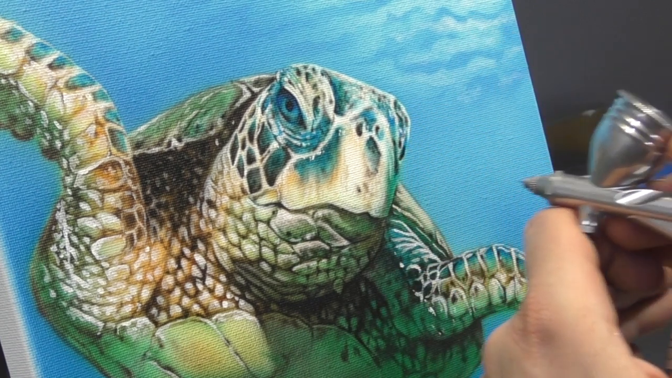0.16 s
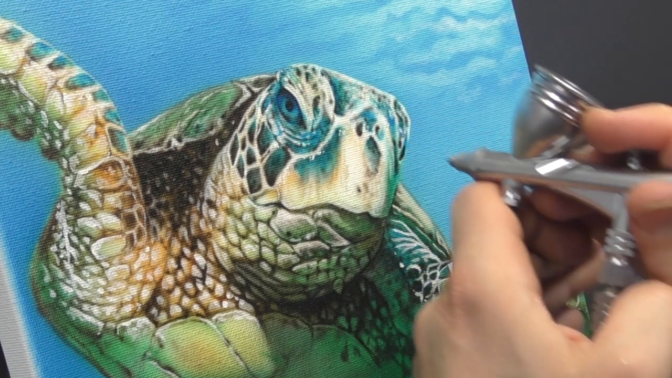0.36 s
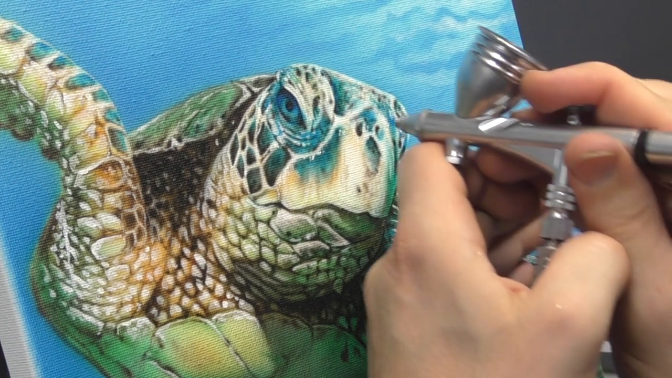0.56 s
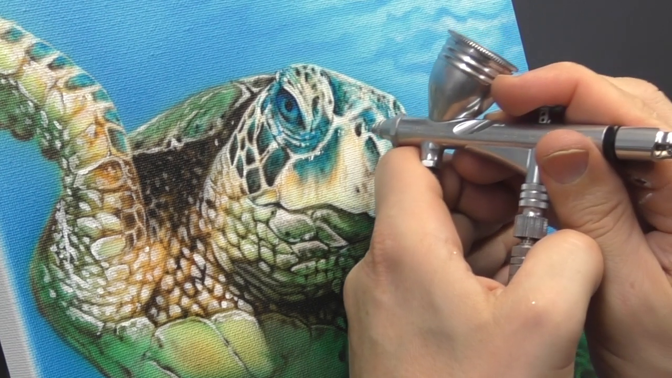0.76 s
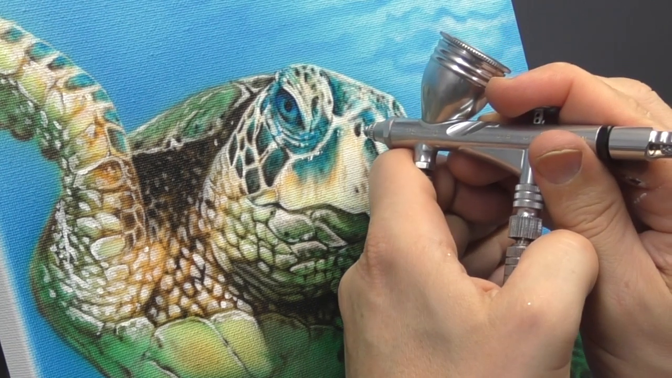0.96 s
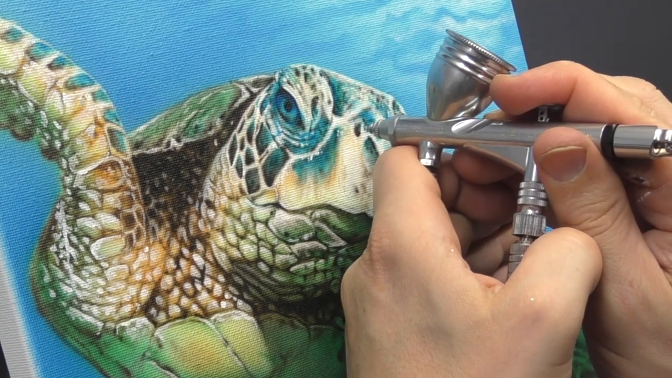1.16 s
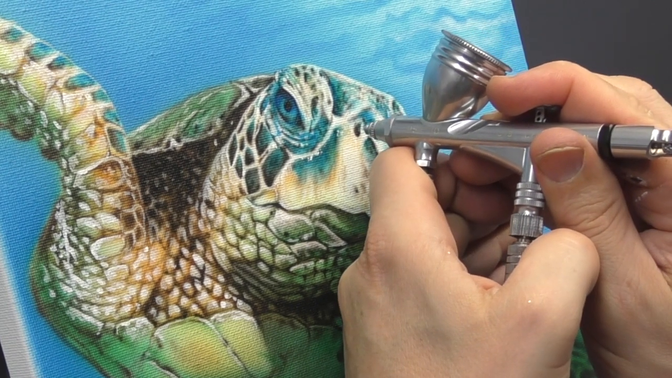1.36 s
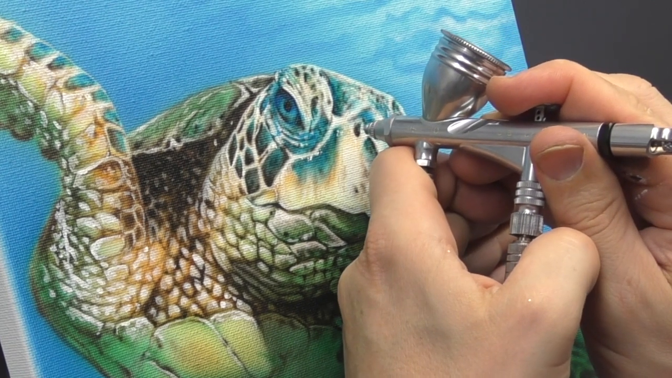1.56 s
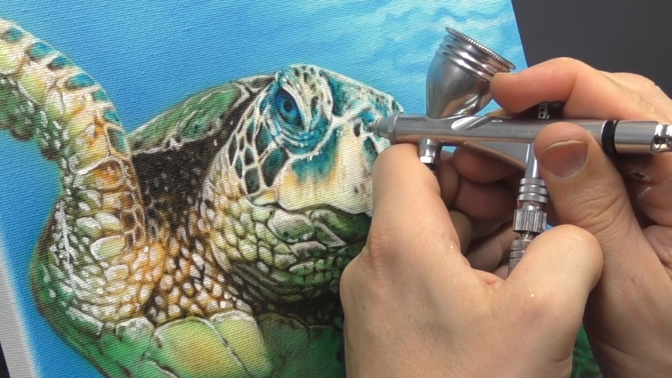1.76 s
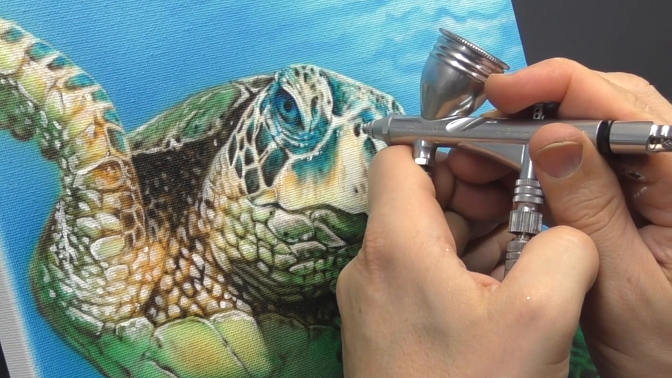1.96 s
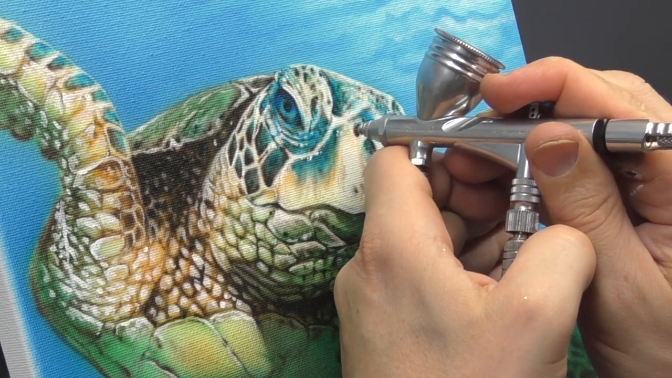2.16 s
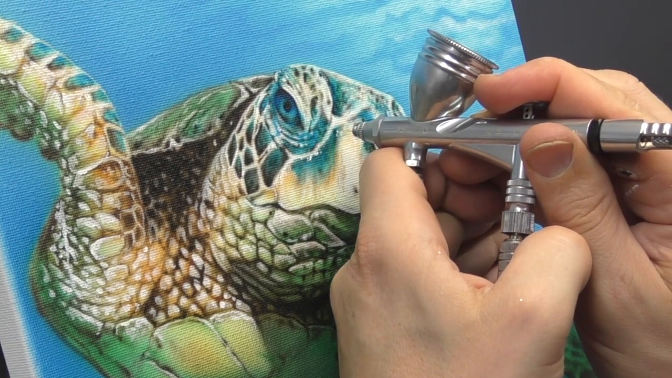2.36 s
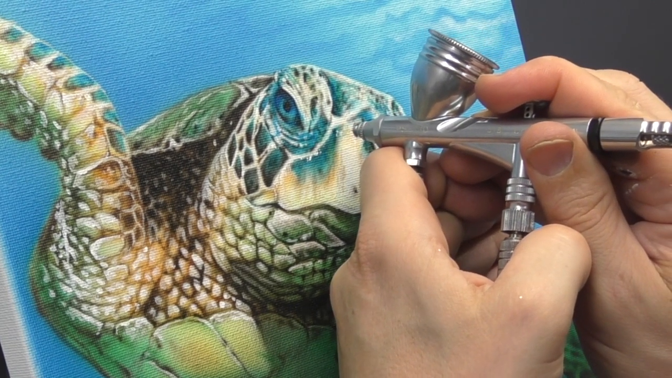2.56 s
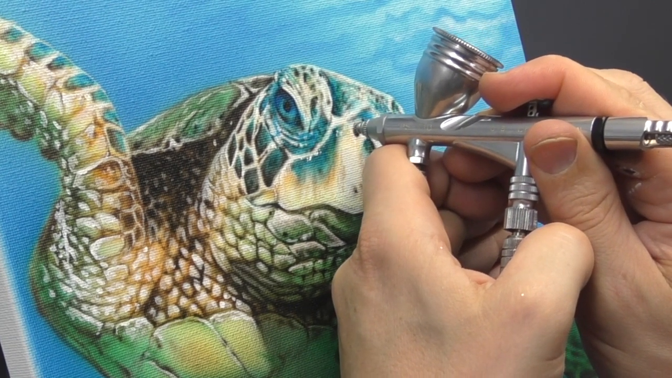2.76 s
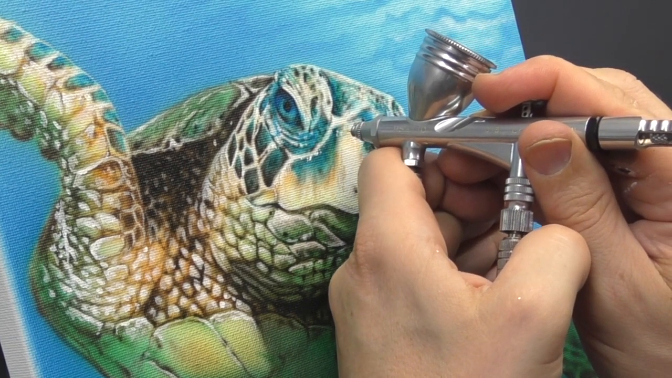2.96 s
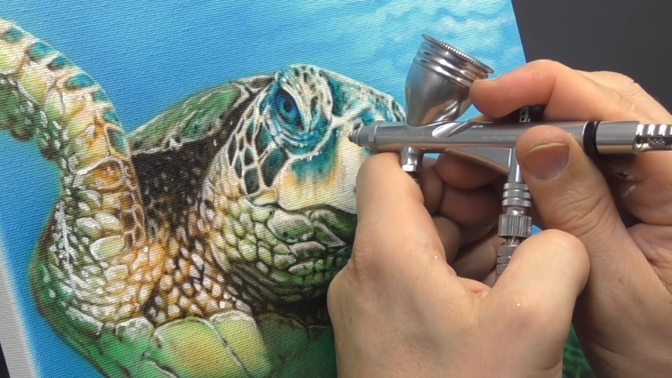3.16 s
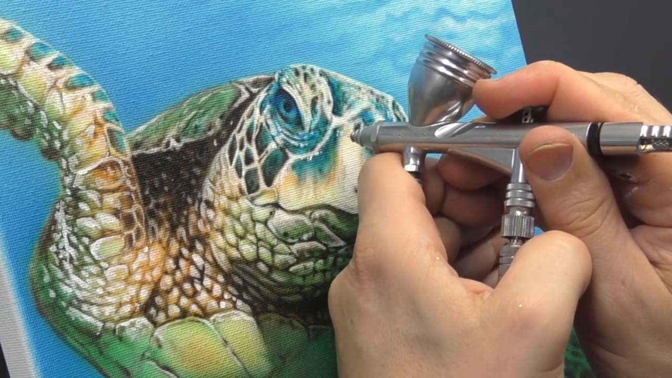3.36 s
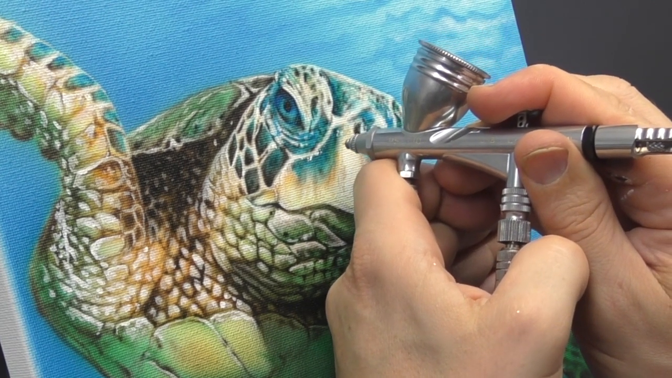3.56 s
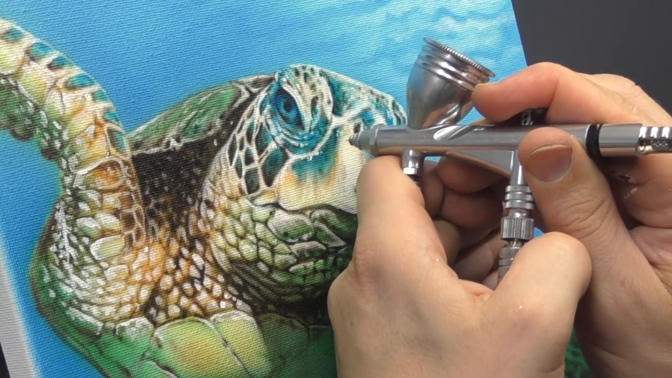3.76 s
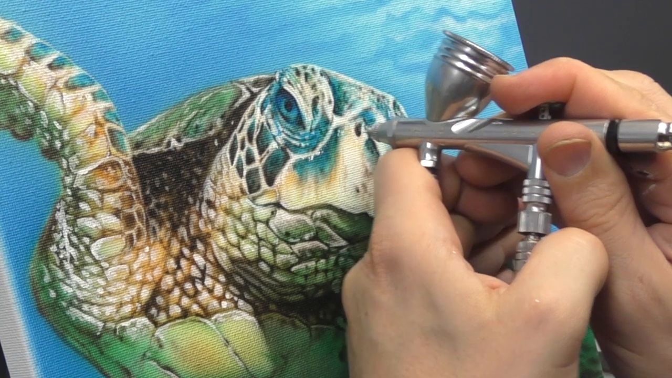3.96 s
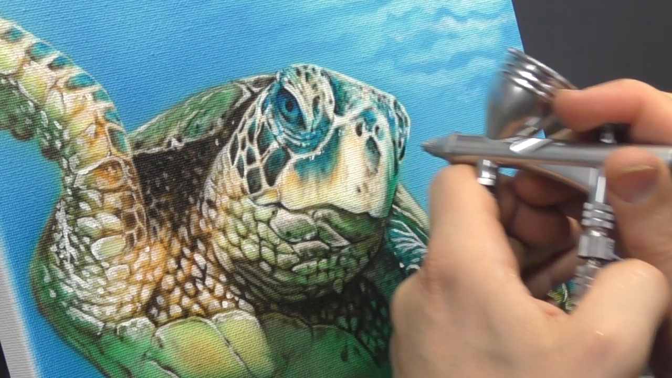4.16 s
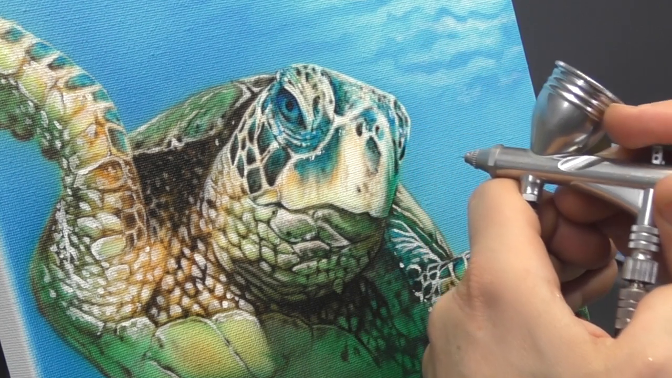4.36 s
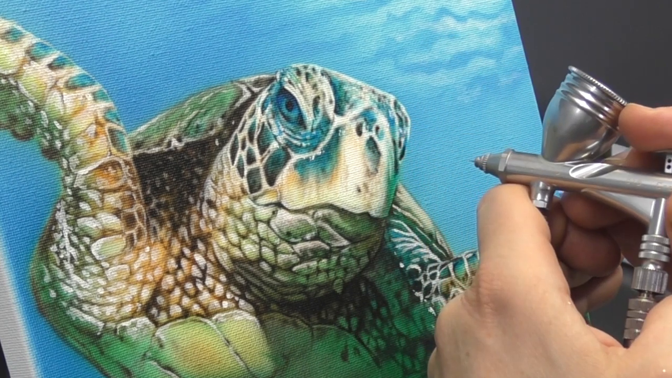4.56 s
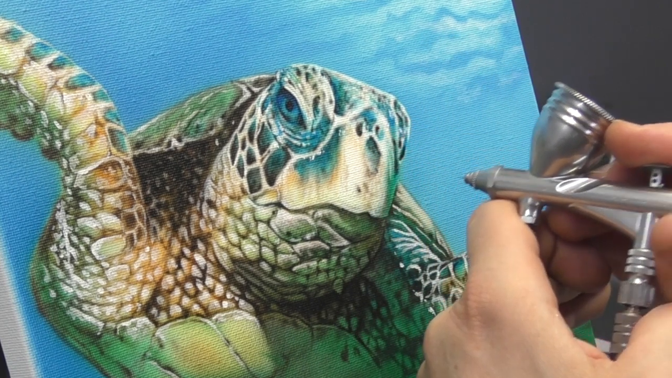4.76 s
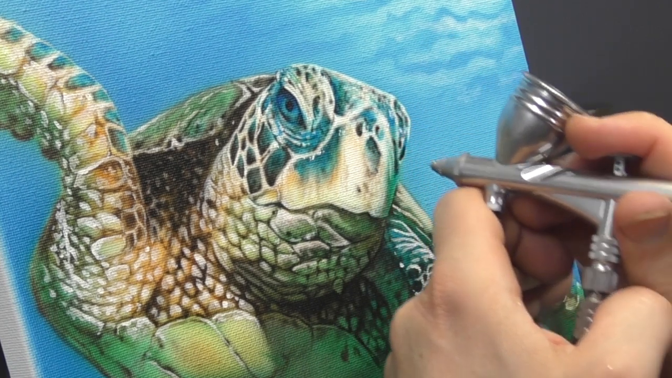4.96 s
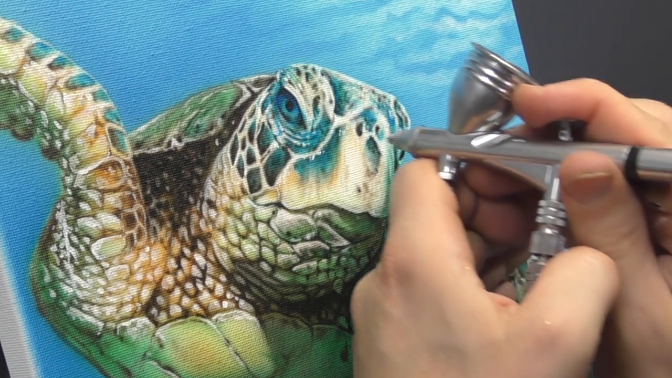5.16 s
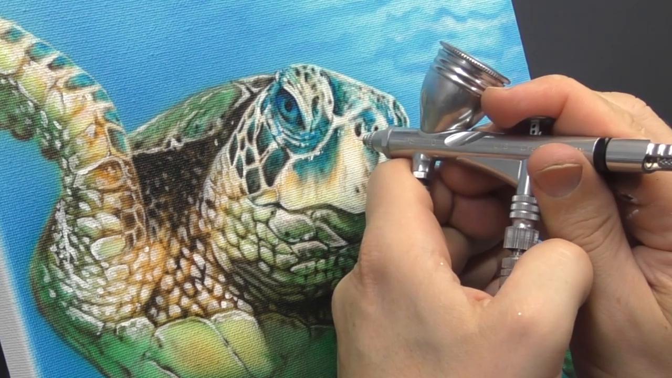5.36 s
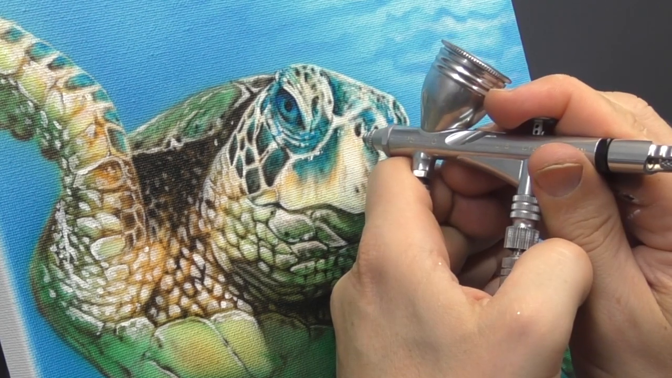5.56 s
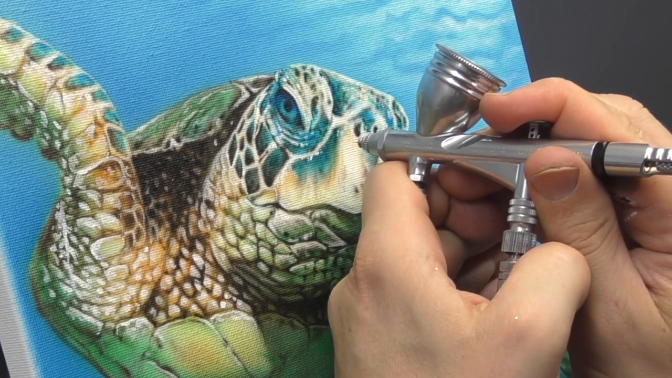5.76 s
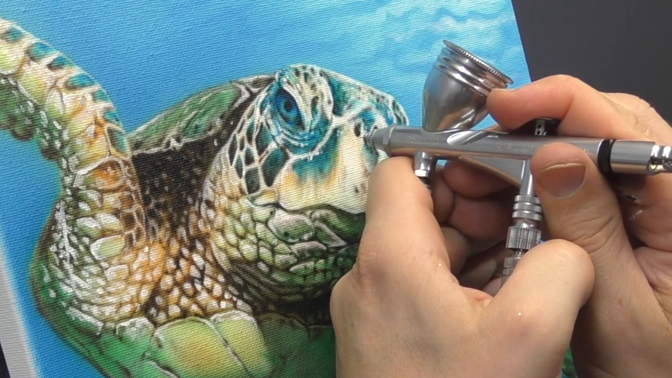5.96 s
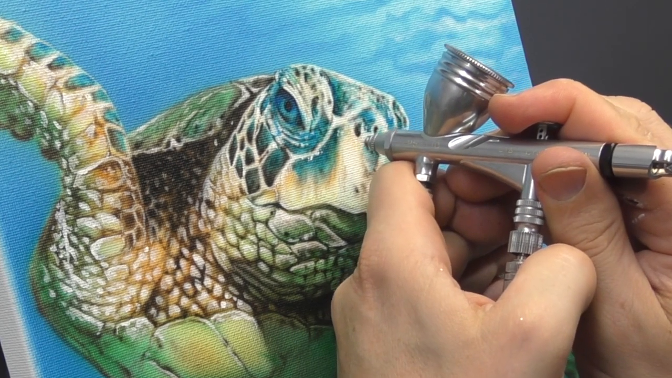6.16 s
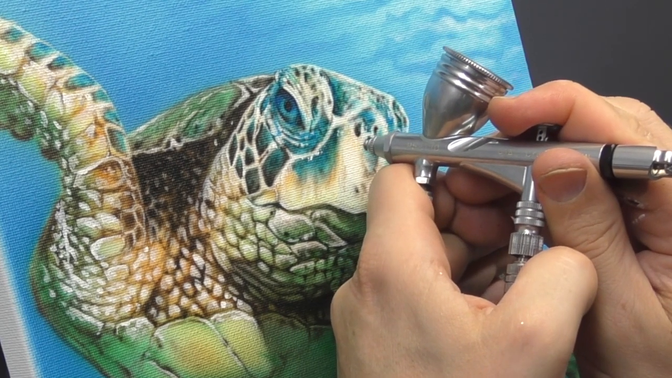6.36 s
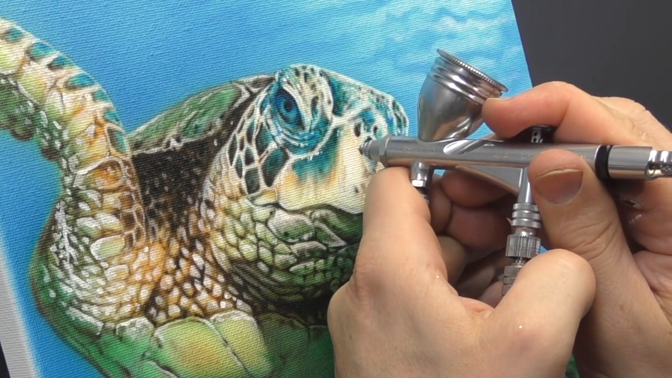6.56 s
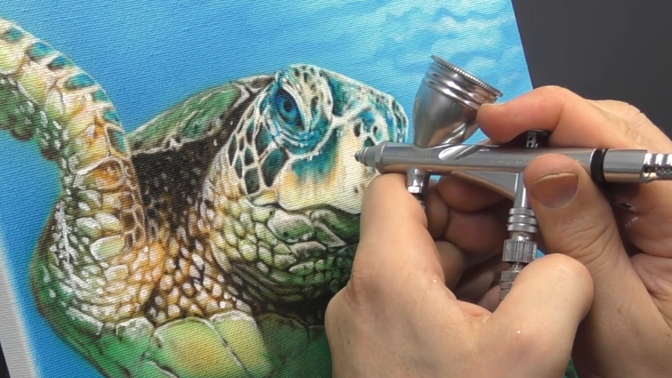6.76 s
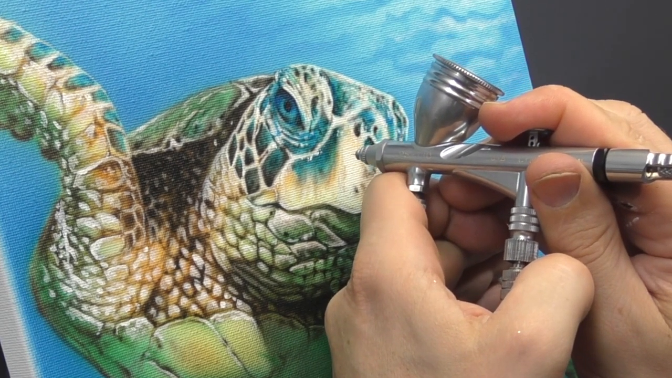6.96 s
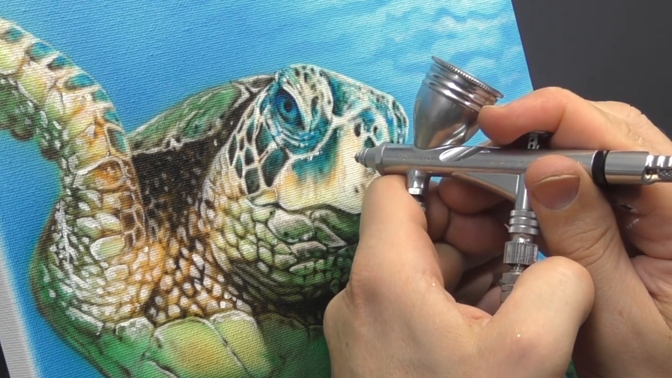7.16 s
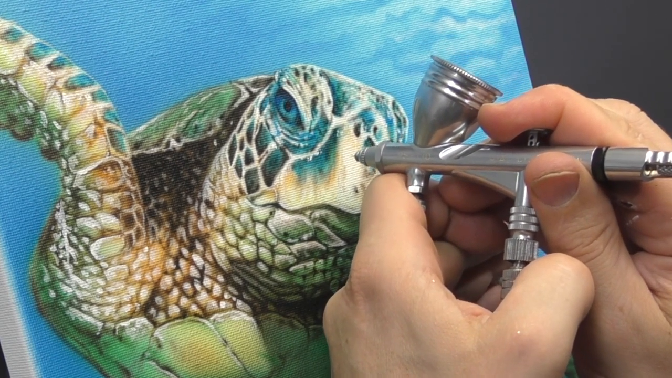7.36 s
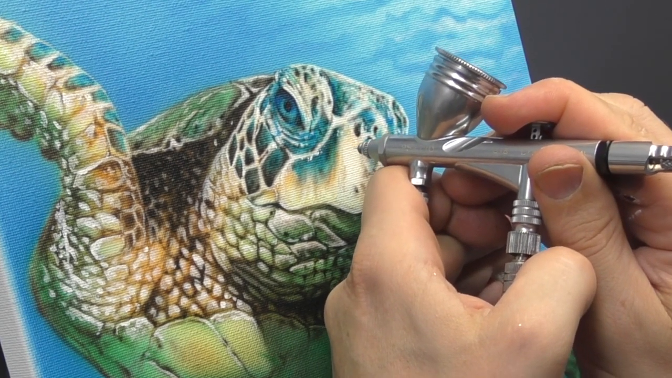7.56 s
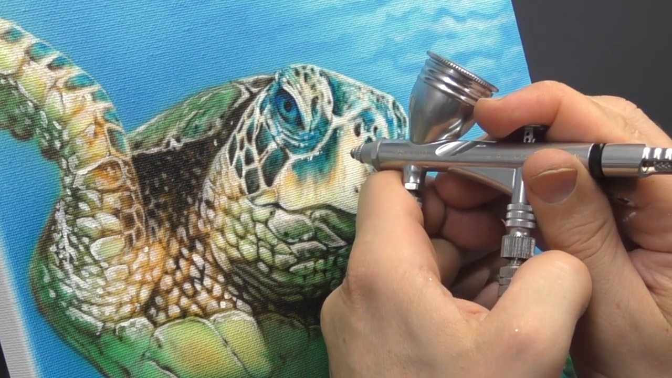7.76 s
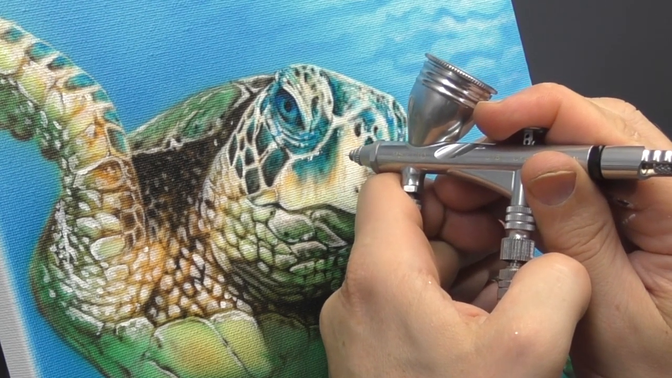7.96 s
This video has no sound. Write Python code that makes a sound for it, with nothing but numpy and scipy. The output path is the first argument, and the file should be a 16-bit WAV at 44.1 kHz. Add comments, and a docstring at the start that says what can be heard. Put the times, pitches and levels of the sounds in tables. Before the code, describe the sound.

In a quiet studio, an airbrush sprays a long crisp hiss, stops briefly with faint handling taps, then sprays again to the end.

```python
"""A bright airbrush hiss, fizzing with droplets, in two long strokes close to a small stereo microphone.
Near the canvas the jet hisses; as a free jet it rushes more hollowly. The second stroke runs on to the end.
The jet is shaped noise set by flow and nozzle gap; soft knocks of the hands are short bursts of noise.
The quiet studio adds echoes and a short tail; beneath lie room noise, mains hum in sines and far traffic,
made of rumbling noise and gliding drones."""
import sys
import numpy as np
from scipy import signal
from scipy.fft import rfft, irfft
from scipy.io import wavfile
from scipy.ndimage import uniform_filter1d

SR = 44100
rng = np.random.default_rng(int(sys.argv[2]) if len(sys.argv) > 2 else 0)


def materialize(psi):
    """Save the field psi as 16-bit PCM at rate SR to the path in sys.argv[1].

    A 1-D psi becomes a single channel; in a 2-D psi each row is a channel.
    """
    bounded = np.clip(np.atleast_2d(psi).T, -1, 1)
    quanta = np.round(bounded * 32767).astype(np.int16)
    wavfile.write(sys.argv[1], SR, quanta)


N = 353682

# Room noise colour: [f/Hz, relative level/dB]
ROOM_COLOUR = [(20, -19), (50, -20.5), (95, 5.5), (250, -1), (420, -6), (620, -22.5), (850, -14),
               (1200, -9.5), (2300, -13.5), (3300, -17.5), (4500, -24), (6500, -31.5), (8800, -27.5),
               (15700, -22.5)]
# Likeness of far sounds in the two channels: [f/Hz, likeness 0-1]
ROOM_LIKENESS = [(30, 0), (80, 0.54), (160, 0.37), (700, 0.28), (1500, 0.4), (3000, 0.56), (7000, 1),
                 (15000, 0.55)]
# Mains hum partials: [f/Hz, rms level/dB]
HUM_PARTIALS = [(100, -79.5), (300, -75), (400, -78), (500, -85.5), (1300, -91), (1500, -82.5), (1700, -88)]
# Far traffic rumble colour: [f/Hz, relative level/dB]
TRAFFIC_COLOUR = [(30, -22), (55, -19), (78, -3), (120, -4), (195, 1), (290, -7.5), (420, -16.5),
                  (900, -29), (3000, -60)]
# Swells of far traffic, one row per rise or fall of the drone:
# [loudest t/s, half length/s, rumble level/dB, drone level/dB, drone f/Hz when loudest, glide/Hz per s]
TRAFFIC_SWELLS = [(0.616, 0.28, -69.5, -68, 140, 22.5), (1.297, 0.4, -68.5, -76, 122, -34.5),
                  (2.304, 0.4, -75, -75, 104, -10.5), (3.444, 0.23, -73, -74, 87, -25),
                  (4.049, 0.42, -68, -66.5, 130, -11), (5.7, 0.3, -74, -72, 125, 8),
                  (6.425, 0.226, -64.5, -73, 139, 22), (7.1, 0.45, -67.5, -70, 115, 14.5),
                  (7.796, 0.25, -71, -66.5, 107, 7)]
# Studio reverberation: [f/Hz, t60/s]
STUDIO_DECAY = [(300, 0.23), (3000, 0.53), (8000, 0.42), (15000, 0.31)]
# Early reflections from easel and desk: [delay t/s, gain]
EASEL_DESK_ECHOES = [(.00318, .11), (.00497, .06)]
# Hands and trigger knocking: [t/s, onset rms level/dB, centre f/Hz, width/octaves, t60/s]
HAND_KNOCKS = [(0.476, -67, 950, 0.48, .12), (0.533, -71, 6500, .5, .04), (0.548, -56.5, 900, 0.56, 0.1),
               (0.609, -52, 1050, 0.55, 0.034), (4.693, -58, 130, 0.59, 0.068),
               (4.927, -70, 7030, 0.51, 0.14), (5.186, -50.5, 280, 0.53, 0.056),
               (5.185, -63, 1900, 1.0, .07)]
# Air seeping past the valve, its colour: [f/Hz, relative level/dB]
VALVE_SEEP_COLOUR = [(200, -11), (700, -9), (1200, 5), (2500, -6), (4200, -7.5), (5500, -9), (8000, -11),
                     (9700, -10), (11500, -14), (15700, -19)]
# Strokes, one row each: [valve opens t/s, valve shuts t/s, starts to close in t/s, is drawn clear t/s,
# rush level relative to mean hiss/dB, seep length/s, seep level/dB]
BRUSH_STROKES = [(0.618, 4.233, 0.71, 4.15, -16.5, 0.12, -76.5), (5.257, 8.1, 5.2, 8.6, -16.5, 0.24, -65)]
# Flow set by the trigger finger, one list a stroke: [t/s, hiss level close to the canvas/dB]
TRIGGER_FLOW = [
    [(0.9, -39), (1.54, -38), (2.21, -39), (2.29, -41), (3.36, -42), (3.45, -40.5), (3.68, -42),
     (3.85, -40)],
    [(5.35, -38.5), (5.44, -38), (7.98, -37)],
]
# Jet colour: [f/Hz, relative level/dB close in first stroke, close in second, as a free jet]
JET_COLOUR = [(250, -22, -19.5, -14.5), (424, -22.5, -21.5, -14), (710, -31, -32, -23),
              (1165, -27.5, -26.5, -13.5), (2970, -18, -18.5, -9.5), (3880, -20.5, -21, -16.5),
              (5060, -20, -18.5, -17), (6770, -15.5, -13, -18), (8020, -13.5, -13.5, -17.5),
              (8900, -7.5, -9, -12), (11800, -3, -2.5, -12), (13140, -7.5, -8, -13.5), (15440, -5, -9, -15),
              (17200, -13.5, -9.5, -13)]
# Fixed ripple in the jet's spectrum, from reflections:
# [f/Hz, width/Hz, lift/dB in first stroke, in second]
JET_RIPPLE = [(1163, 450, 4.5, 3.5), (2110, 70, 3.0, 2.0), (2541, 70, 3.0, 2.5), (3058, 250, 1.0, 2.5),
              (3402, 130, 1.5, 3.5), (3962, 130, 1.5, 2.5), (4436, 130, 3.5, 2.5), (4694, 130, 1.0, 2.5),
              (5297, 70, 1.5, 2.5), (5556, 70, 0.5, 3.0), (6202, 130, 1.5, 3.5), (6503, 70, 3.0, 3.5),
              (7364, 450, 1.5, 2.5), (8140, 130, 1.0, 2.0), (8398, 70, 4.0, 6.5), (8958, 70, -1.5, 3.0),
              (9345, 70, 3.5, 3.5), (9388, 450, -2.5, 2.0), (9604, 70, 0.0, 4.0), (10293, 70, 1.5, 2.5),
              (11757, 450, -2.0, 2.0), (11929, 130, 3.0, 0.0), (12963, 130, 0.5, 2.5),
              (15030, 450, -0.5, 2.5)]
# Stereo likeness, balance and phase of the jet: [f/Hz, likeness 0-1, left over right/dB, left lead/rad]
JET_STEREO = [(100, .5, -.3, 0), (600, .25, 0, 0), (1000, .33, 0, -.1), (1600, .7, 0, -.1),
              (2200, .965, .1, 0), (3800, .975, .1, 0), (5200, .999, 0, 0), (12500, .999, 0, 0),
              (13300, .98, 0, 0), (13800, .86, .1, .05), (14350, .52, .6, .4), (15100, .56, -4, 1),
              (15800, .6, -3, .15)]

TIME = np.arange(N) / SR
FRAME_S = np.arange(N // 256 + 5) * 256 / SR
BIN_HZ = np.fft.rfftfreq(1024, 1 / SR)
EDGE_HZ = 15750  # top of the recorder's band
ROOM_DB, RUMBLE_DB = -63.5, -76.5  # room noise; traffic between the swells

# the valve snaps open and bleeds off more slowly
RISE_S, BLEED_S = 0.011, 0.018
# nozzle gap (0 touching - 1 free jet) while painting, and time constants of the hand
WORKING_GAP, APPROACH_S, WITHDRAW_S = 0.038, 0.072, 0.058
# the hiss has a bump at a middling gap and is weaker as a free jet
LOUDEST_GAP, LOUDEST_OCTAVES, LOUDEST_DB, FREE_HISS_DB = 0.4, 1.0, 3.5, -3
# the rush grows as a free jet and follows only a share of each change of flow
FREE_RUSH_DB, RUSH_FOLLOWS = 3, 0.35
# pressure stored in the hose lifts the rush in a short puff when the valve opens
PUFF_DB, PUFF_S = 2.5, 0.027


def gain_of(db):
    """Decibels to amplitude."""
    return 10 ** (np.asarray(db) / 20)


def evened(x):
    """Scales to rms 1."""
    return x / np.sqrt(np.mean(x ** 2) + 1e-20)


def over_hz(rows, hz=BIN_HZ):
    """Every column of a table, read along log frequency."""
    f, *columns = np.transpose(rows)
    return [np.interp(np.log(hz + 1), np.log(f + 1), c) for c in columns]


def over_time(rows, t=TIME):
    """Every column of a table, read along time."""
    s, *columns = np.transpose(rows)
    return [np.interp(t, s, c) for c in columns]


def wander(rate_hz):
    """Smooth random motion of rms 1 that fades out above about the given rate."""
    hz = np.fft.rfftfreq(N, 1 / SR)
    return evened(irfft(rfft(rng.standard_normal(N)) * np.exp(-(hz / rate_hz) ** 2), N))


def hump(hz, centre_hz, octaves):
    """A bell of height 1 on the octave scale."""
    return np.exp(-.5 * (np.log2((hz + 1) / centre_hz) / octaves) ** 2)


def share(power):
    """Each frame's spectrum as shares of its total."""
    return power / power.sum(-1, keepdims=True)


def colour_share(rows):
    """Power shares of a level table."""
    return share(gain_of(over_hz(rows)[0]) ** 2)


def noise_pair(power, same, patchy_db, balance_db=0, lead=0):
    """Stereo noise of the given power in each frame and bin, uneven in small shifting patches."""
    a, b, c, d, patches = rng.standard_normal((5, len(FRAME_S), len(BIN_HZ)))
    patches = uniform_filter1d(patches, size=8, axis=0)
    patches = evened(uniform_filter1d(patches, size=10, axis=1))
    same = np.clip(same, -1, 1)
    left = a + 1j * b
    right = same * left + np.sqrt(1 - same ** 2) * (c + 1j * d)
    left = left * gain_of(balance_db / 2) * np.exp(1j * lead)
    spectra = np.array([left, right / gain_of(balance_db / 2)])
    spectra *= np.sqrt(power) * gain_of(patchy_db * patches)
    pair = signal.istft(spectra.transpose(0, 2, 1), nperseg=1024, noverlap=768)[1][:, :N]
    return np.sqrt(1.5) * pair  # makes up for overlapping unrelated frames


def room_noise():
    """Diffuse air noise of the room, less alike in the two channels in the bass."""
    noise = noise_pair(colour_share(ROOM_COLOUR), over_hz(ROOM_LIKENESS)[0], patchy_db=1.23)
    return gain_of(ROOM_DB) * noise


def mains_hum(waver=0.29):
    """Steady sines at multiples of 100 Hz, wavering together in level."""
    hum = sum(gain_of(db) * np.sin(2 * np.pi * (hz * TIME + rng.random())) for hz, db in HUM_PARTIALS)
    return np.sqrt(2) * hum * (1 + waver * wander(rate_hz=2.8))


def traffic(waver_hz=2.07, flicker=0.12):
    """Far traffic swells and fades, each swell a rumble with an engine drone that glides in pitch."""
    power, drones = gain_of(RUMBLE_DB) ** 2, np.zeros(N)
    waver = waver_hz * wander(rate_hz=7.5)
    for s, half_length, rumble_db, drone_db, hz, glide in TRAFFIC_SWELLS:
        age = TIME - s
        near = 1 / (1 + (age / half_length) ** 4)
        power = power + gain_of(rumble_db) ** 2 * near
        # the glide levels off before and after the swell
        pitch = hz + glide * 2 * half_length * np.tanh(age / (2 * half_length)) + waver
        cycles = np.cumsum(pitch) / SR + rng.random()
        drones += gain_of(drone_db) * near * np.sin(2 * np.pi * cycles)
    rumble = noise_pair(colour_share(TRAFFIC_COLOUR), over_hz(ROOM_LIKENESS)[0], patchy_db=1.0)
    return np.sqrt(power) * rumble + np.sqrt(2) * drones * (1 + flicker * wander(rate_hz=12))


def studio(x):
    """A short diffuse tail, its decay set by frequency, turning steadily between three random tails."""
    hz, t, z = signal.stft(rng.standard_normal((3, SR // 2)), SR, nperseg=256)
    t60 = over_hz(STUDIO_DECAY, hz)[0][:, None]
    tails = signal.istft(z * gain_of(-60 * t / t60), SR, nperseg=256)[1]
    tails *= np.minimum(TIME[:tails.shape[1]] / 0.0073, 1) ** 2  # the tail builds up over 7.3 ms
    out = np.zeros_like(x)
    for k, tail in enumerate(tails):
        turn = np.sqrt(2 / 3) * np.cos(np.pi * (TIME / 2 + k / 3))  # the squares add up to 1
        out += signal.fftconvolve(x * turn, tail[None] / np.linalg.norm(tail), axes=1)[:, :N]
    return out


def nearby(x):
    """Easel and desk add quick faint echoes."""
    echoes = sum(gain * np.pad(x, ((0, 0), (round(delay * SR), 0)))[:, :N]
                 for delay, gain in EASEL_DESK_ECHOES)
    return x + echoes


def knocks():
    """Hands on the tool: short bursts of banded noise, each with a 1 ms onset and exponential decay."""
    out, hz = np.zeros((2, N)), np.fft.rfftfreq(N, 1 / SR)
    for s, db, centre_hz, octaves, t60 in HAND_KNOCKS:
        white = rng.standard_normal(N) + .5 * rng.standard_normal((2, N))  # mostly alike left and right
        burst = evened(irfft(rfft(white) * hump(hz, centre_hz, octaves), N))
        age = np.maximum(TIME - s, 0)
        out += burst * gain_of(db - 60 * age / t60) * np.minimum(age / .001, 1)
    return out


def seep():
    """As the trigger is pressed, more and more air seeps past the valve until it opens."""
    level = sum(gain_of(db) * np.interp(TIME, [opens - length, opens, opens + RISE_S], [0, 1, 0])
                for opens, *_, length, db in BRUSH_STROKES)
    return noise_pair(colour_share(VALVE_SEEP_COLOUR), same=0.71, patchy_db=4.0) * level


def nozzle_gap(closes_in, clear):
    """The hand slows as it nears the canvas and speeds up as it leaves: 0 touching - 1 free jet."""
    coming = np.exp(np.minimum((closes_in - FRAME_S) / APPROACH_S, 0))
    going = np.exp(np.minimum((FRAME_S - clear) / WITHDRAW_S, 0))
    return np.clip(WORKING_GAP + coming + going, .001, 1)[:, None]


def jet_colour(stroke, gap, extra_db, swell=0.74, drift_db=0.4):
    """Jet power spectrum, close or free, with fixed ripple and a crest that grows with the hiss."""
    *close, free = over_hz(JET_COLOUR)
    ripple = sum(lifts[stroke] / (1 + (2 * (BIN_HZ - hz) / width) ** 2)
                 for hz, width, *lifts in JET_RIPPLE)
    crest = swell * extra_db * hump(BIN_HZ, centre_hz=10200, octaves=0.14)
    # the spectrum drifts slowly and slightly at random
    drift = rng.standard_normal((len(FRAME_S), len(BIN_HZ)))
    drift = uniform_filter1d(drift, size=130, axis=0)
    drift = evened(uniform_filter1d(drift, size=3, axis=1))
    db = (1 - gap) * (close[stroke] + crest) + gap * free
    db = db + (1 - 0.51 * gap) * ripple + drift_db * drift
    return gain_of(db) ** 2 * BIN_HZ ** 2 / (BIN_HZ ** 2 + 90 ** 2)  # bass rolls off below 90 Hz


def droplets(per_s=200, spread_db=3.0, surge_s=0.00019):
    """Paint tearing off the needle: very short surges in the hiss, at random times and sizes."""
    size = gain_of(spread_db * np.minimum(rng.exponential(1, N), 4))
    size = size * (rng.random(N) < per_s / SR)
    return signal.lfilter([1], [1, -np.exp(-1 / (surge_s * SR))], size)


def spray(stroke, flutter=0.042, fizz=0.13):
    """One stroke: turbulent hiss above, rush below, set by flow and gap and let through by the valve."""
    opens, shuts, closes_in, clear, rush_below_db, _, _ = BRUSH_STROKES[stroke]
    gap = nozzle_gap(closes_in, clear)
    flow_db = over_time(TRIGGER_FLOW[stroke], FRAME_S)[0][:, None]
    usual_db = np.mean(TRIGGER_FLOW[stroke], axis=0)[1]

    gap_bump = np.exp(-.5 * (np.log2(gap / LOUDEST_GAP) / LOUDEST_OCTAVES) ** 2)
    hiss_db = flow_db + FREE_HISS_DB * gap + LOUDEST_DB * gap_bump
    rush_db = usual_db + rush_below_db + RUSH_FOLLOWS * (flow_db - usual_db) + FREE_RUSH_DB * gap
    rush_db = rush_db + PUFF_DB * np.exp(-np.maximum(FRAME_S - opens, 0) / PUFF_S)[:, None]

    colour = jet_colour(stroke, gap, hiss_db - usual_db)
    upper = 1 / (1 + (4500 / (BIN_HZ + 1)) ** 8)  # hiss and rush meet at 4500 Hz
    hiss_power = share(colour * upper) * gain_of(hiss_db) ** 2
    rush_power = share(colour * (1 - upper)) * gain_of(rush_db) ** 2
    same, balance_db, lead = over_hz(JET_STEREO)
    hiss = noise_pair(hiss_power, same, patchy_db=1.0, balance_db=balance_db, lead=lead)
    rush = noise_pair(rush_power, same, patchy_db=1.0, lead=lead)

    eddies = wander(rate_hz=610)  # the same eddies shake both parts of the jet
    hiss *= evened(np.exp(flutter * eddies) * (1 + fizz * droplets()))
    rush *= evened(np.exp(flutter * eddies / 2))
    opening = 1 - np.exp(-(np.maximum(TIME - opens, 0) / RISE_S) ** 2)
    closing = np.exp(-np.maximum(TIME - shuts, 0) / BLEED_S)
    return (hiss + rush) * opening * closing


def scene(wet_db=-12):
    """The airbrush close by, its studio tail, and the room, hum and traffic behind."""
    strokes = sum(spray(stroke) for stroke in range(len(BRUSH_STROKES)))
    tool = nearby(strokes + seep() + knocks())
    return tool + gain_of(wet_db) * studio(tool) + room_noise() + mains_hum() + traffic()


def record(dry):
    """The recorder's band limit: a steep low-pass filter."""
    low_pass = signal.firwin(1023, EDGE_HZ, window=("kaiser", 9), fs=SR)
    return signal.oaconvolve(dry, low_pass[None], "same")


dry = scene()
out = record(dry)
materialize(out)
```